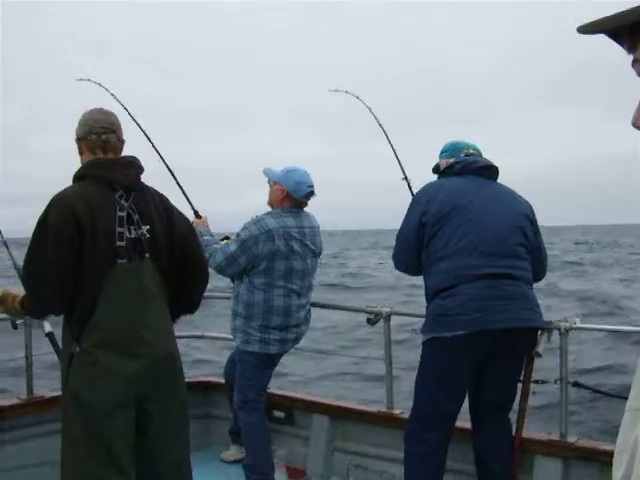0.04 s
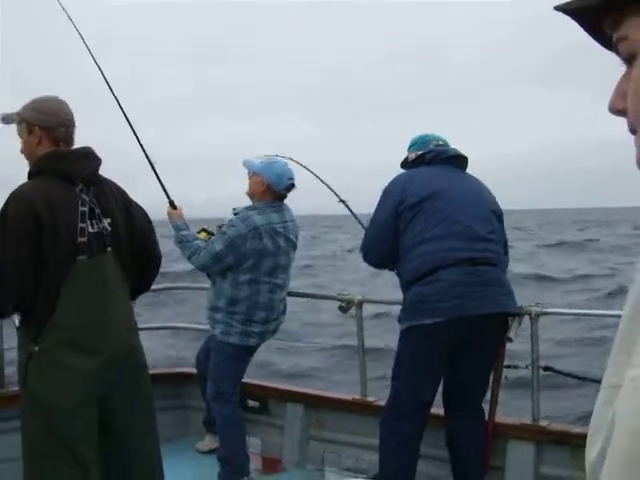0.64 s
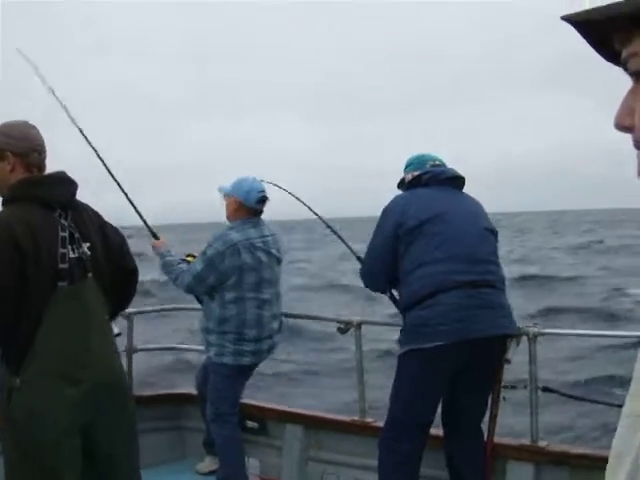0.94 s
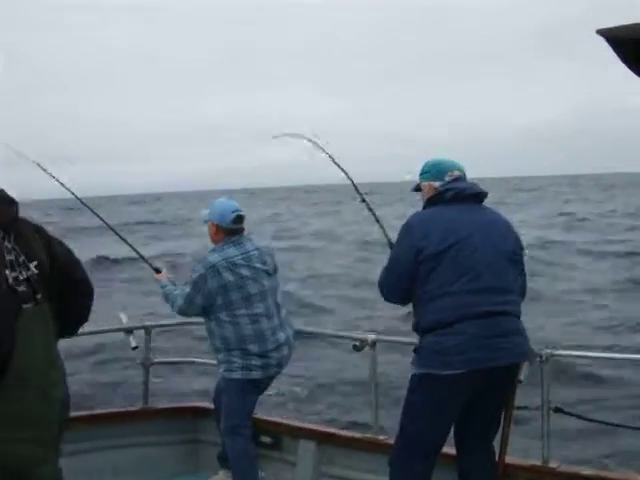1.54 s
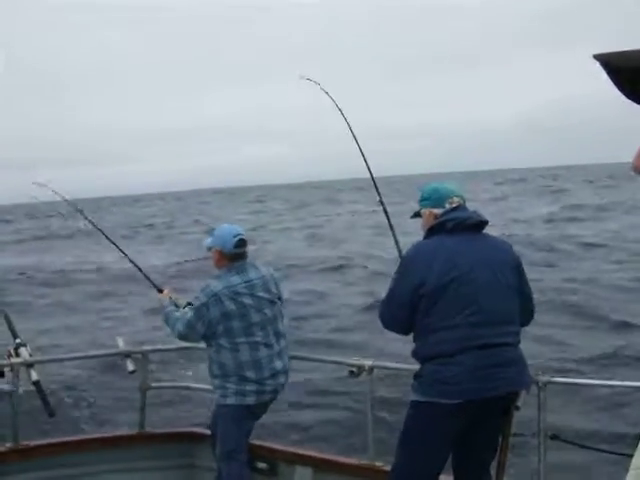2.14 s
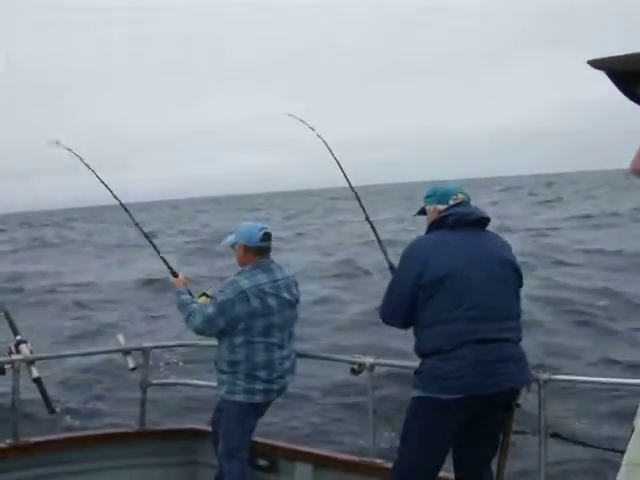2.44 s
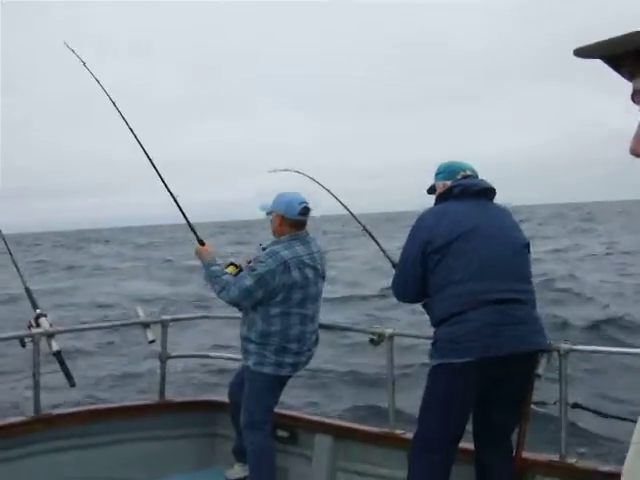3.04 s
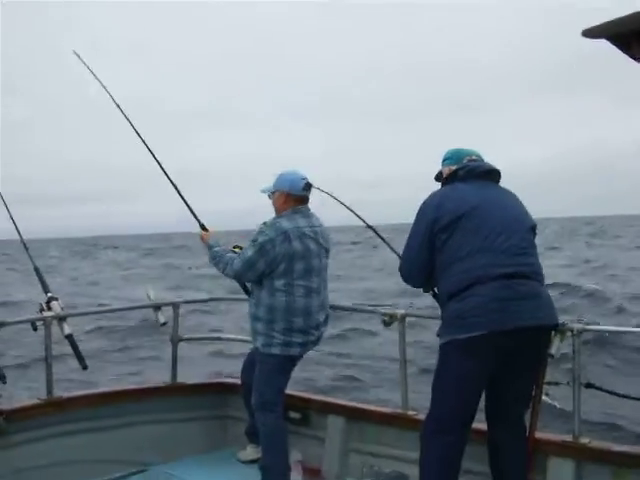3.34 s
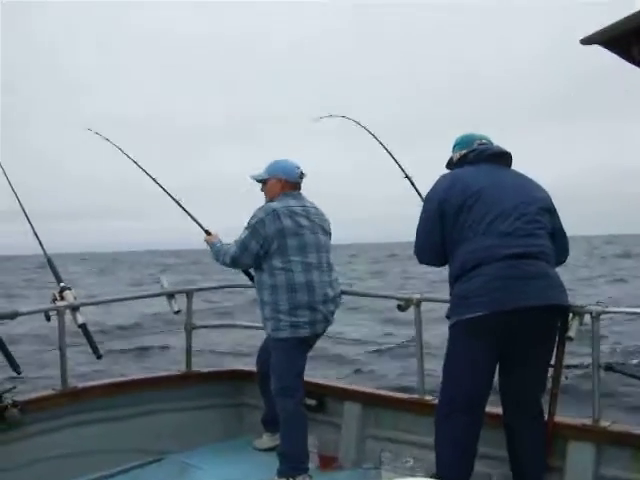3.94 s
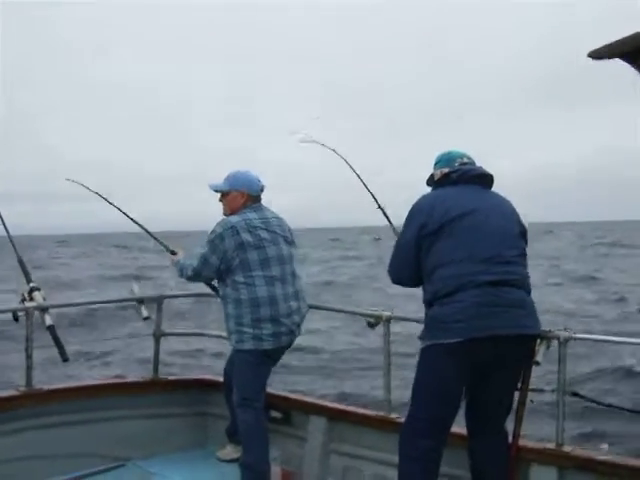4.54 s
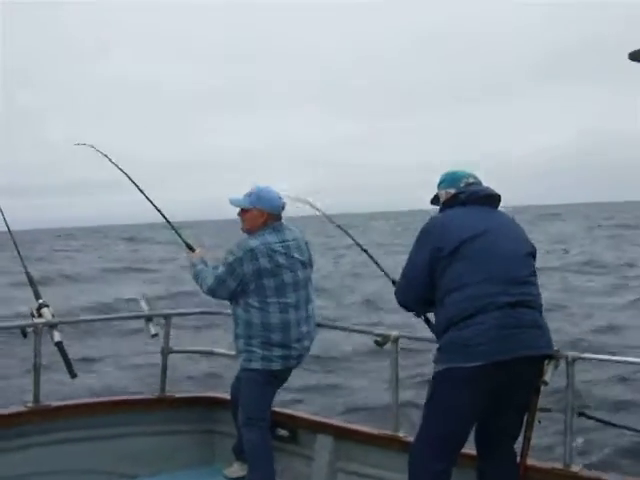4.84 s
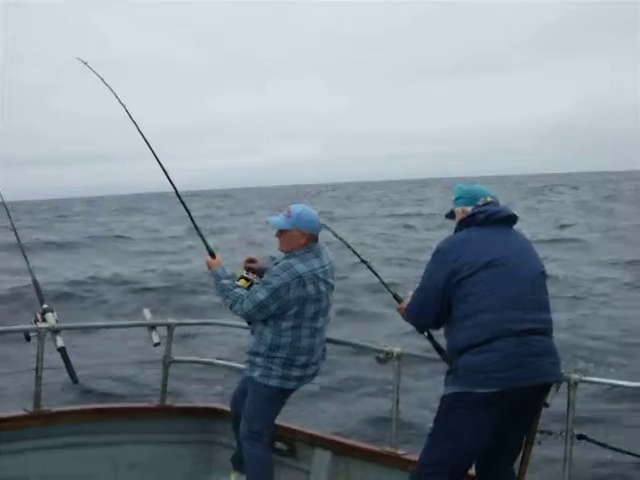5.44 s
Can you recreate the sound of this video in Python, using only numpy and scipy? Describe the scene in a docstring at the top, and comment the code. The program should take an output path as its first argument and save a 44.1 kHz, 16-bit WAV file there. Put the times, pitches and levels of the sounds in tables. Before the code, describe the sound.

Gusts rumble and pop on the microphone over an idling boat engine, sea wash, and light reel clicks, swishes and squeaks.

```python
"""A six-cylinder diesel idles throughout under a fishing boat's deck, over the hiss of the sea:
firings drone, the block clatters, wind rumbles on the microphone. First a reel's pawl ticks.
From 0.8 s eddies pop on the microphone; then jackets and line swish, tackle squeaks by stick-slip,
and a thin gear whine comes and goes. The strongest gust hits near 2.7 s.
From 3.4 s the reel turns twice more, softer; gusts and pops go on to the end."""
import sys
import numpy as np
from scipy import signal
from scipy.fft import rfft, irfft
from scipy.io import wavfile

SR = 44100
rng = np.random.default_rng(int(sys.argv[2]) if len(sys.argv) > 2 else 0)


def wrap_up_sound(samples):
    """Save the sound to the file named by the first command line argument, as 16-bit audio."""
    columns = np.atleast_2d(samples).T
    # keep every value between -1 and 1, then stretch to whole-number steps
    tamed = np.clip(columns, -1, 1)
    steps = np.round(tamed * 32767).astype(np.int16)
    wavfile.write(sys.argv[1], SR, steps)


N = 250432
TIME = np.arange(N) / SR
CYLINDERS = 6
WAVE_PERIOD_S, FIRST_CREST_S = 1.45, 1.14

# sea wash before the wave swell: t/s, level/dB
WASH_LEVEL = [(0, -46), (.9, -42), (1.7, -41.5), (2.35, -44), (2.9, -45.5), (3.55, -39), (4.4, -43),
              (5.68, -43.5)]
# sea wash: f/Hz, density/dB
WASH_SPECTRUM = [(300, 0.5), (1500, 5.5), (2100, -0.5), (2600, 2.5), (3500, 0.5), (3850, 3.5), (4200, 4.5),
                 (4500, 2), (4900, 2.5), (5500, 0.5), (6800, -2.5), (7700, -3), (9000, -6.5)]
# strokes of cloth and line: centre/s, length/s, level/dB, band centre/Hz, half width/octaves
SWISH_STROKES = [(.99, 0.25, -42, 3830, .7), (1.156, 0.029, -37.5, 4000, 1),
                 (1.441, .11, -42.5, 6000, 0.85), (1.77, 0.048, -34.5, 5600, 1.3),
                 (1.823, 0.055, -34, 4100, 2.3), (1.977, 0.006, -34, 6500, 0.4),
                 (2.218, 0.16, -44, 6000, 0.86), (2.494, .065, -31.5, 5200, 1.14),
                 (2.665, .17, -38, 2600, 2.3), (3.098, 0.058, -35.5, 6000, 1.1),
                 (3.407, 0.044, -41.5, 6440, 0.95), (3.63, 0.053, -38, 6000, 0.99),
                 (4.108, 0.15, -30, 5140, .65)]
# rubbed cloth and line: f/Hz, density/dB
RUB_SPECTRUM = [(1000, 3), (2100, 1.5), (2650, 2.5), (3000, -0.5), (3700, 1.5), (4200, -1), (4800, -1),
                (5400, -4.5), (6000, -4), (6700, -1), (7600, -4), (8500, -4.5)]
# rod and reel squeaks: t/s, length/s, level/dB, f/Hz
TACKLE_SQUEAKS = [(1.46, 0.022, -42, 6500), (1.508, 0.04, -34, 4980), (1.637, 0.04, -45, 4300),
                  (1.744, 0.014, -29.5, 4030), (2.065, 0.042, -44, 6300), (2.49, 0.053, -40, 2720),
                  (2.732, .04, -46, 4130), (2.802, .07, -50, 4110), (3.076, 0.014, -23, 1358),
                  (3.083, 0.032, -31.5, 1348), (4.095, 0.066, -34, 4600)]
# reel turns: start/s, end/s, level/dB, tick rate/Hz
REEL_TURNS = [(0.124, .9, -43, 21.3), (3.446, 4.0, -49, 20), (4.252, 4.7, -48, 21)]
# pawl rasp: f/Hz, density/dB
PAWL_SPECTRUM = [(1000, -27.5), (2700, -6), (4200, -2), (5200, 3), (8000, -6.5)]
# gusts: peak/s, Gaussian width/s, level/dB
WIND_GUSTS = [(1.35, 0.49, -33.5), (2.1, 0.35, -34.5), (2.73, .16, -27.5), (3.3, 0.23, -31),
              (4.355, 0.3, -32.5), (5.08, 0.21, -31), (5.624, 0.18, -30.5)]
# wind rumble: f/Hz, density/dB
RUMBLE_SPECTRUM = [(4, -10.5), (15, 4.5), (30, -4.5), (60, -2), (130, -3.5), (200, -5), (320, -13),
                   (500, -20), (900, -36.5), (2000, -60.5)]
# large eddies at the microphone: t/s, level/dB, f/Hz
LARGE_EDDIES = [(0.818, -13, 200), (1.183, -13, 270), (1.208, -11, 230), (1.367, -11, 280),
                (1.611, -7.5, 220), (1.777, -2.5, 580), (2.328, -5.5, 145), (2.628, -15, 159),
                (2.766, -0.5, 320), (2.819, -12.5, 210), (2.887, -12.5, 290), (3.176, -9.5, 238),
                (3.284, -12, 380), (3.314, -16, 213), (4.033, -12.5, 230), (4.217, -19, 120),
                (4.316, -12, 340), (4.648, -13, 125), (4.73, -8.5, 230), (4.968, -8, 290),
                (5.049, -12, 300), (5.106, -12.5, 300), (5.571, -14.5, 360), (5.597, -7, 310),
                (5.658, -8.5, 210)]
# engine speed: t/s, firing rate/Hz
FIRING_RATE = [(0, 30.35), (.3, 30.35), (.75, 30.07), (1.25, 29.91), (1.75, 30.07), (3.1, 29.95),
               (3.75, 30.03), (5.68, 30.03)]
# gear whine: start/s, end/s, f/Hz, level/dB
WHINE_SPELLS = [(1.4, 1.85, 1131, -45), (3.464, 4.28, 1141, -43.5), (4.7, 4.997, 1120, -42.5),
                (5.174, 5.752, 1118, -43.5)]
# block clatter before the wave swell: t/s, level/dB
CLATTER_LEVEL = [(0, -41.5), (.7, -37), (1.6, -36.5), (2.3, -38.5), (3.0, -38), (3.45, -36.5), (4.9, -36),
                 (5.68, -38)]
# block clatter, muffled by the deck: f/Hz, density/dB
CLATTER_SPECTRUM = [(150, -11.5), (300, -5.5), (450, -1), (600, -1), (800, 0), (950, 1), (1040, -0.5),
                    (1130, 0.5), (1260, -3), (1420, -17.5), (1650, -14), (2200, -19), (4000, -41)]
# exhaust and hull lines: multiple of the cycle rate, level/dB
DRONE_ORDERS = [(6, -45.5), (9, -43), (12, -27), (14, -58), (15, -45.5), (17, -59.5), (18, -22),
                (19, -30.5), (20, -45.5), (21, -36.5), (23, -35), (24, -47.5), (26, -35.5), (27, -38.5),
                (28, -49), (32, -36.5), (50, -50.5), (54, -50.5), (66, -47.5), (189, -53), (198, -50.5)]


def amp(db):
    """dB to gain."""
    return 10 ** (np.asarray(db) / 20)


def unit(x):
    """Scale to rms 1."""
    return x / np.sqrt(np.mean(x ** 2) + 1e-20)


def curve(rows):
    """Linear interpolation of (t/s, value) rows."""
    return np.interp(TIME, *np.transpose(rows))


def colour(x, spectrum):
    """Filter by (f/Hz, level/dB) rows; rms 1."""
    hz, db = np.transpose(spectrum)
    bins_hz = np.fft.rfftfreq(len(x), 1 / SR)
    gain = amp(np.interp(np.log(bins_hz + 1), np.log(hz), db))
    return unit(irfft(rfft(x) * gain, len(x)))


def drift(size, cutoff_hz):
    """Slow random motion; rms about 1."""
    length = min(N, max(size, SR // 4))
    low_pass = np.exp(-(np.fft.rfftfreq(length, 1 / SR) / cutoff_hz) ** 2)
    return unit(irfft(rfft(rng.standard_normal(length)) * low_pass, length))[:size]


def swell(period_s, top_s):
    """Slow cosine with a crest at top_s."""
    return np.cos(2 * np.pi * (TIME - top_s) / period_s)


def add(mix, start_s, sound):
    """Mix a sound in at start_s."""
    start = round(start_s * SR)
    part = mix[max(start, 0):][:max(len(sound) + min(start, 0), 0)]
    part += sound[max(-start, 0):][:len(part)]


def sea_wash(flicker_db=1.93, wave_db=0.55):
    """Water hisses along the hull, rising with each wave, flickering as wavelets break."""
    fizz = rng.standard_normal(N) * amp(flicker_db * drift(N, 60))
    level_db = curve(WASH_LEVEL) + wave_db * swell(WAVE_PERIOD_S, FIRST_CREST_S)
    return amp(level_db) * colour(fizz, WASH_SPECTRUM)


def cloth_swishes(grain_db=2.5, fall_oct=0.5):
    """Rubbed cloth and line: grainy hiss that swells, fades and dulls as the stroke slows."""
    out = np.zeros(N)
    for centre_s, length_s, db, hz, width_oct in SWISH_STROKES:
        size = round(length_s * SR)
        along = np.linspace(0, 1, size)
        stroke = amp(db) * abs(np.sin(np.pi * along)) ** 0.86
        offset_oct = np.log2((np.fft.rfftfreq(size, 1 / SR) + 1) / hz)
        # crossfade, bright band to dull band
        for share, shift_oct in (1 - along, fall_oct / 2), (along, -fall_oct / 2):
            grains = rng.standard_normal(size) * amp(grain_db * drift(size, 400))
            band = 1 / (1 + ((offset_oct - shift_oct) / width_oct) ** 2)
            hiss = colour(irfft(rfft(grains) * band, size), RUB_SPECTRUM)
            add(out, centre_s - length_s / 2, stroke * np.sin(np.pi / 2 * share) * hiss)
    return out


def tackle_squeaks(resonance_hz=3580, top_hz=8200, sag=0.022, jitter=0.025, db_per_harmonic=-13.5):
    """Stick-slip: a rough, sagging tone, strongest in the harmonics near the tackle's resonance."""
    out = np.zeros(N)
    for start_s, length_s, db, hz in TACKLE_SQUEAKS:
        strongest = max(resonance_hz / hz, 1)
        size = round(length_s * SR)
        pitch_hz = hz * (1 + sag * np.linspace(.5, -.5, size) + jitter * drift(size, 500))
        phase = 2 * np.pi * np.cumsum(pitch_hz) / SR
        tone = sum(amp(db_per_harmonic * abs(k - strongest)) * np.sin(k * phase)
                   for k in range(1, int(top_hz / hz) + 1))
        tone += amp(-18) * np.sin(phase)  # the slip rate always sounds
        grip = 1 + 0.36 * drift(size, 350)
        add(out, start_s, amp(db) * unit(tone * grip) * signal.windows.tukey(size, .8))
    return out


def reel_ticks(rise_s=.0016, ring_hz=3080, decay_s=.007, stray_s=.002, uneven_db=2.3):
    """The pawl rasps over each tooth and rings briefly."""
    rasps, rings = np.zeros(N), np.zeros(N)
    t = TIME[:2400]
    rasp_envelope = t / rise_s * np.exp(1 - t / rise_s)
    ring = amp(-1) * np.exp(-t / decay_s) * np.sin(2 * np.pi * ring_hz * t)
    for start_s, end_s, db, rate_hz in REEL_TURNS:
        scatter = rng.standard_normal(size=(60, 2))
        for due_s, (late, hard) in zip(np.arange(start_s, end_s, 1 / rate_hz), scatter):
            tick_s = due_s + stray_s * late
            gain = amp(db + uneven_db * hard)
            add(rasps, tick_s, gain * rasp_envelope)
            add(rings, tick_s, gain * ring)
    return rings + rasps * colour(rng.standard_normal(N), PAWL_SPECTRUM)


def eddy(hz):
    """One pressure swing of random shape as an eddy passes the microphone port."""
    t = np.arange(-900, 901) / SR
    pulse = (1 - 2j * np.pi * hz * t / 3) ** -4
    return (pulse * np.exp(2j * np.pi * rng.random())).real


def wind_rumble(breeze_db=-35.5, lumpy_db=3.0, spread_db=7.0, eddy_hz=220):
    """Lumpy rumble and small eddies follow the gusts over a steady breeze."""
    gust_power = sum((amp(db) * np.exp(-.5 * ((TIME - peak_s) / width_s) ** 2)) ** 2
                     for peak_s, width_s, db in WIND_GUSTS)
    strength = np.sqrt(amp(breeze_db) ** 2 + gust_power)
    turbulence = rng.standard_normal(N) * amp(lumpy_db * drift(N, 40))
    out = strength * amp(6) * colour(turbulence, RUMBLE_SPECTRUM)
    for when, force, pitch in rng.random(size=(200, 3)):
        swing = amp(spread_db * force) * eddy(eddy_hz * 2 ** (2 * pitch - 1))
        add(out, (when * N - len(swing) / 2) / SR, strength[int(when * N)] * swing)
    return out


def wind_pops(wake_db=-20.5, wake_s=0.011, shed_db=-15.0, shed_s=.025, shed_hz=200):
    """Each large eddy pops on the microphone with two smaller ones, in a brief turbulent flurry."""
    out, flurry = np.zeros(N), np.zeros(N)
    for centre_s, db, hz in LARGE_EDDIES:
        pop = amp(db) * eddy(hz)
        start_s = centre_s - len(pop) / 2 / SR
        add(out, start_s, pop)
        for lag, pitch in rng.uniform(-1, 1, (2, 2)):
            add(out, start_s + shed_s * lag, amp(shed_db) * eddy(shed_hz * 2 ** (pitch / 2)))
        flurry += amp(db + wake_db) * np.exp(-abs(TIME - centre_s) / wake_s)
    wake = colour(rng.standard_normal(N), [(60, -7), (200, -2), (450, -4), (900, -20), (2500, -42.5)])
    return out + flurry * wake


def gear_whine(waver_hz=2.4, flutter_db=2.5, fade_s=0.06):
    """A thin, wavering gear tone comes and goes."""
    out = np.zeros(N)
    detune_hz = waver_hz * drift(N, 16.2)
    for start_s, end_s, hz, db in WHINE_SPELLS:
        fade = np.clip(np.minimum(TIME - start_s, end_s - TIME) / fade_s, 0, 1)
        out += amp(db) * fade * np.sin(2 * np.pi * np.cumsum(hz + detune_hz) / SR)
    return np.sqrt(2) * amp(flutter_db * drift(N, 15)) * out


def engine_cycles(strong_beat_s=.056):
    """Cycles since a firing of the strongest cylinder; each cylinder fires once per cycle."""
    cycles = np.cumsum(curve(FIRING_RATE)) / SR / CYLINDERS
    return cycles - np.interp(strong_beat_s, TIME, cycles)


def block_clatter(cycles, repeat_share=0.62, firing_depth=0.19, valve_depth=0.31, gain_db=1.87):
    """Firings and valve taps rattle the block; much of the rattle repeats each cycle."""
    size = round(N / (cycles[-1] - cycles[0]))
    repeated = rng.standard_normal(size)[(cycles % 1 * (size - 1)).astype(int)]
    rattle = np.sqrt(repeat_share) * repeated + np.sqrt(1 - repeat_share) * rng.standard_normal(N)
    firings = np.cos(2 * np.pi * CYLINDERS * cycles)
    valves = np.cos(2 * np.pi * 22 * cycles)
    knocks = rattle * np.exp(firing_depth * firings + valve_depth * valves)
    level_db = curve(CLATTER_LEVEL) + 0.5 * swell(WAVE_PERIOD_S, FIRST_CREST_S) + gain_db
    return amp(level_db) * colour(knocks, CLATTER_SPECTRUM)


def diesel_drone(cycles, scatter_rad=0.353, waver=0.099, roll_db=1.25):
    """Unequal cylinders add lines beside the firing harmonics: one throb per cycle."""
    out = np.zeros(N)
    for order, db in DRONE_ORDERS:
        lag_rad = scatter_rad * rng.standard_normal() * (order / 18) ** 4  # high lines take more paths
        sway = 1 + waver * (drift(N, 10.0) + 1j * drift(N, 4.6))
        phase = 2 * np.pi * order * cycles + lag_rad
        out += amp(db) * (sway * np.exp(1j * phase)).real
    boat_roll = swell(period_s=1.72, top_s=3.55)
    return np.sqrt(2) * amp(roll_db * boat_roll) * out


def scene():
    """Engine, wind, sea and anglers in open air; mono."""
    cycles = engine_cycles()
    engine = diesel_drone(cycles) + block_clatter(cycles) + gear_whine()
    weather = wind_rumble() + wind_pops() + sea_wash()
    anglers = cloth_swishes() + tackle_squeaks() + reel_ticks()
    return (engine + weather + anglers)[None]


def record(dry, ceiling=.705, threshold_db=-11.0, duck_share=0.6, recovery_db_per_s=87.5,
           attack_s=0.0017, cutoff_hz=8200):
    """The largest pops overload the input with a crack; gain control ducks after them; low-pass."""
    clipped = np.clip(dry, -ceiling, ceiling)
    over_db = np.maximum(20 * np.log10(abs(clipped[0]) + 1e-9) - threshold_db, 0)
    recovery_db = recovery_db_per_s * TIME
    held_db = np.maximum.accumulate(over_db + recovery_db) - recovery_db
    pole = np.exp(-1 / (attack_s * SR))
    duck_db = duck_share * signal.lfilter([1 - pole], [1, -pole], held_db)
    low_pass = signal.firwin(101, cutoff_hz, window=("kaiser", 8), fs=SR)
    return signal.oaconvolve(clipped * amp(-duck_db), low_pass[None], "same")


dry = scene()
out = record(dry)
wrap_up_sound(out)
```